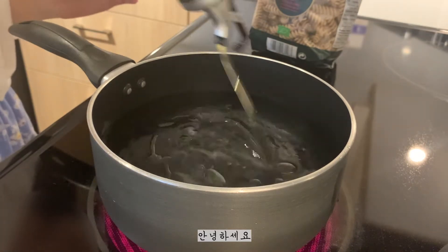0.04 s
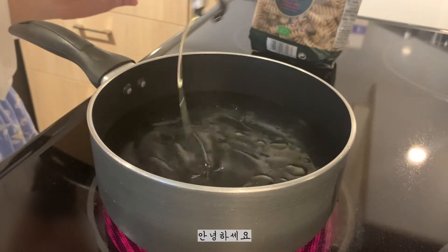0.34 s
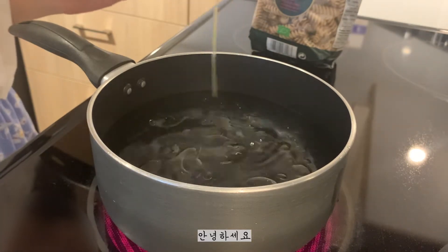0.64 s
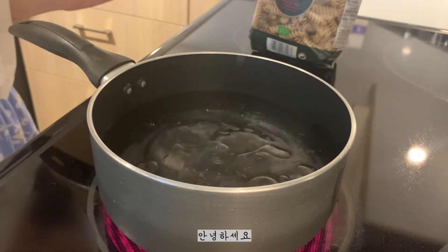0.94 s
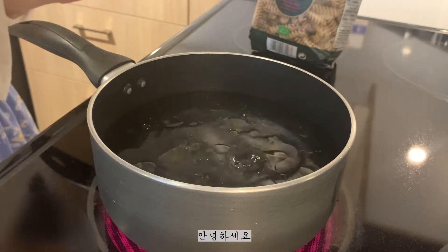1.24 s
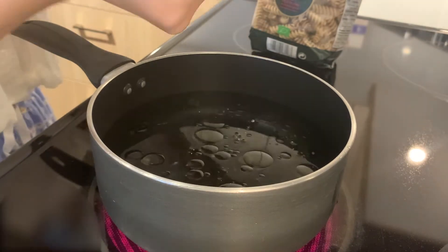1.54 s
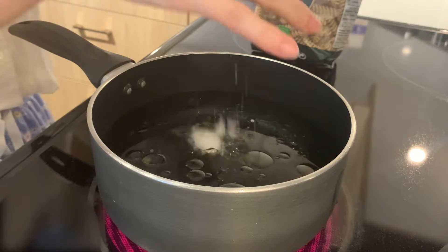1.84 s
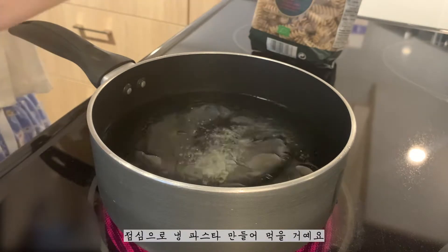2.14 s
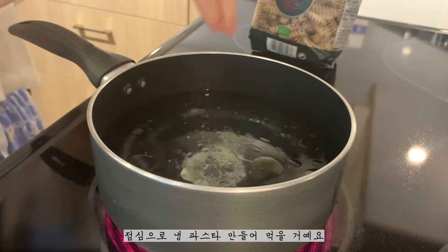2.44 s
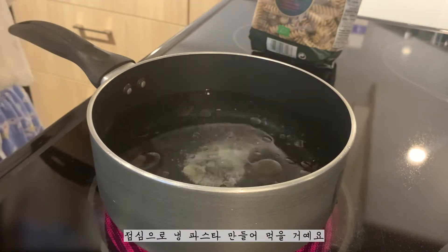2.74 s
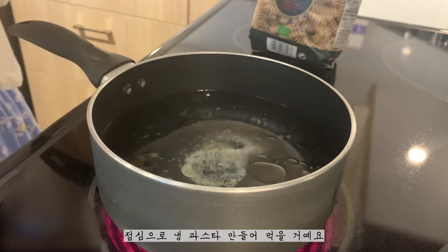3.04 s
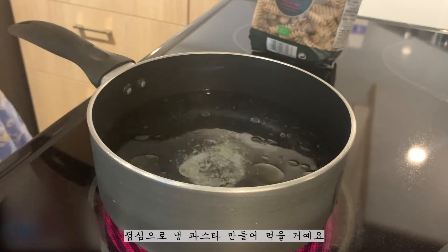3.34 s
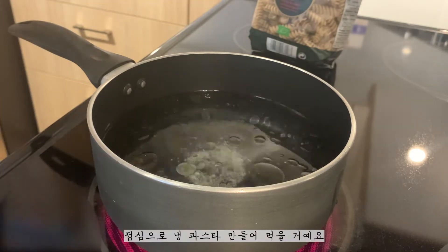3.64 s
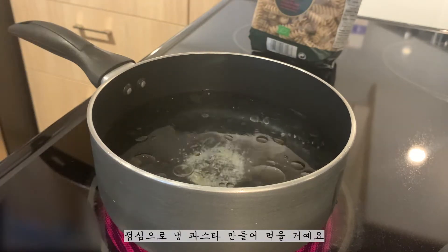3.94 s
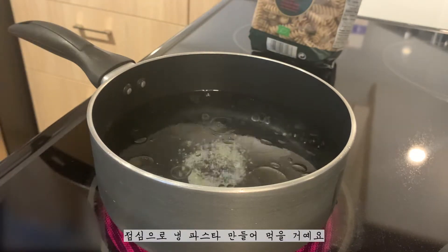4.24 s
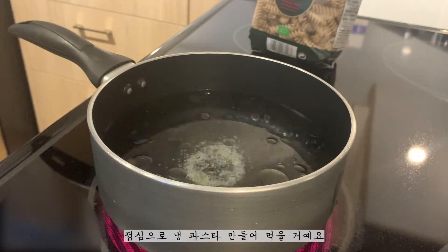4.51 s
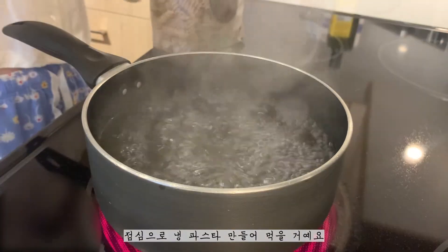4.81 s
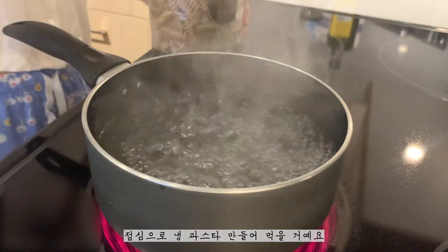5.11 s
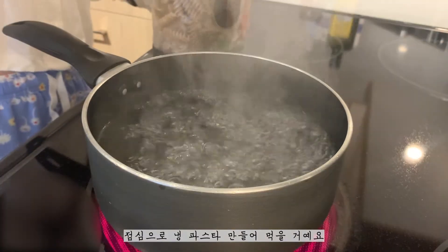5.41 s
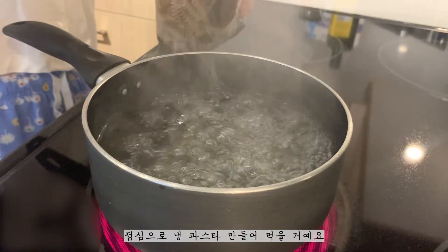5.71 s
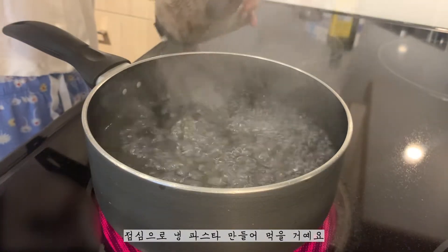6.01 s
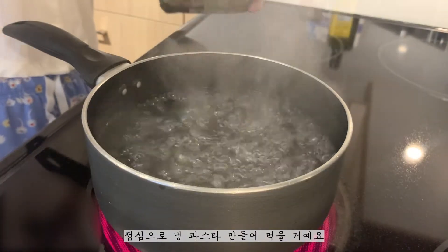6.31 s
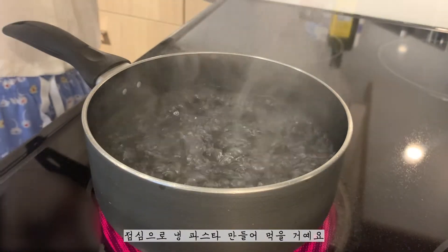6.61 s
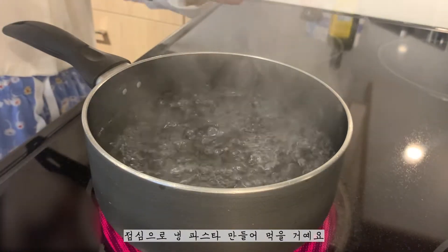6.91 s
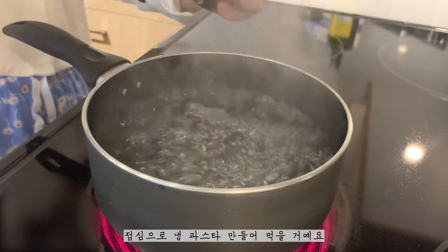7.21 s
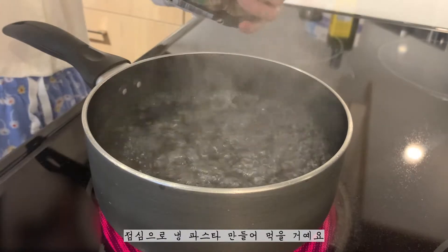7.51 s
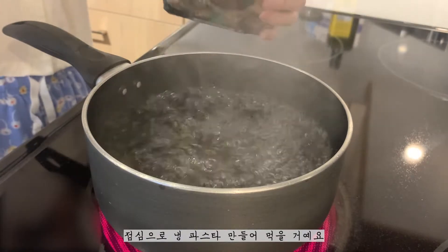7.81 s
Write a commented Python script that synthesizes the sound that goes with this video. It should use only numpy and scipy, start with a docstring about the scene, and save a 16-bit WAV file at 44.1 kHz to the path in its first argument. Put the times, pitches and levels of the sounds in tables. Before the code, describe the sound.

A saucepan of water simmers with a low rumble in a small kitchen, heard close up. Oil crackles briefly on the water, a jar clinks, and salt hisses in. The jar clinks again and knocks on the counter. The sound changes abruptly to a rolling boil, with dry pasta sliding and clacking in a crinkling packet over several shakes. The boil carries on with popping bubbles.

```python
"""A small kitchen: a saucepan simmers on a glass hob. Collapsing steam bubbles rumble, small ones tick,
oil crackles on the water and salt hisses in. A jar clinks, ringing in clusters of modes, and knocks
the counter. Then a rolling boil: bubbles ring and burst, spray fizzes, steam pockets throb, while dry
pasta slides, thuds and clacks in its crinkling packet. The air in the pan rings with boil and pasta."""
import sys
import numpy as np
from scipy import signal
from scipy.fft import rfft, irfft, next_fast_len
from scipy.io import wavfile
from scipy.ndimage import uniform_filter1d

SR = 44100
rng = np.random.default_rng(int(sys.argv[2]) if len(sys.argv) > 2 else 0)


def wav_record(signal):
    """Record a signal, one row per channel, as 16-bit PCM in the file named by sys.argv[1]."""
    frames = np.transpose(np.atleast_2d(signal))
    bounded = np.clip(frames, -1, 1)
    # unit amplitude maps onto the largest positive 16-bit level
    quanta = np.round(bounded * 32767).astype(np.int16)
    wavfile.write(sys.argv[1], SR, quanta)


N = 346626
TIME_S = np.arange(N) / SR
BOIL_START_S = 4.579

# spurts of oil on the water: start_s, length_s, level_db
OIL_SPURTS = [(0.746, .11, -51), (0.889, .015, -48.5), (0.915, .105, -46.5), (1.87, 0.021, -53.5)]
# loudest spits of the oil: start_s, peak_db
OIL_SPITS = [(.752, -31), (0.8111, -27.5), (0.8456, -30.5), (0.928, -24), (0.9586, -28.5), (0.9866, -30),
             (1.0209, -27.5)]


def amp(db):
    """Decibels to gain."""
    return 10 ** (np.asarray(db) / 20)


def unit(x):
    """Scale to rms 1."""
    return x / np.sqrt(np.mean(x ** 2) + 1e-20)


def along(points, hz):
    """Interpolate (freq_hz, value) points on a log axis."""
    freqs_hz, values = np.transpose(points)
    return np.interp(np.log(hz + 1), np.log(freqs_hz + 1), values)


def during(start_s, stop_s, fade_s):
    """Gate with an exponential release."""
    return (TIME_S >= start_s) * np.exp(-np.maximum(TIME_S - stop_s, 0) / fade_s)


def swells(rows, attack_s, release_s):
    """Rise, hold and decay for each (start_s, length_s, level_db) row."""
    return sum(amp(db) * np.clip((TIME_S - s) / attack_s, 0, 1) * during(s, s + length_s, release_s)
               for s, length_s, db in rows)


def filtered(x, response):
    """Apply a frequency response."""
    n = x.shape[-1]
    padded = next_fast_len(n + 2048)
    return irfft(rfft(x, padded) * response(np.fft.rfftfreq(padded, 1 / SR)), padded)[..., :n]


def toned(x, tone):
    """Shape by (freq_hz, gain_db) points; rms 1."""
    return unit(filtered(x, lambda hz: amp(along(tone, hz))))


def noise(size=N):
    """White noise in two rows: head-on, sideways."""
    return rng.standard_normal((2, size))


def band(centre_hz, width_hz, size=N):
    """Resonant noise with gentle skirts; rms 1."""
    return unit(filtered(noise(size), lambda hz: 1 / (1 + (2 * (hz - centre_hz) / width_hz) ** 2)))


def with_energy(x, envelope):
    """Give each row the envelope's energy."""
    return x * np.linalg.norm(envelope) / np.linalg.norm(x, axis=1, keepdims=True)


def add(track, start_s, sound):
    """Mix a sound in at a time."""
    part = track[:, round(start_s * SR):][:, :sound.shape[-1]]
    part += sound[..., :part.shape[-1]]


def grains(per_s, low_hz, high_hz, cycles, spread_db, rise=0):
    """Random damped tones; rise lifts the pitch, as when a bubble nears the surface."""
    when, pitch, luck, place = rng.random((int(per_s * N / SR), 4)).T
    hz = low_hz * (high_hz / low_hz) ** pitch
    size = hz * amp(-spread_db * np.log(.01 + .99 * luck))
    life = (cycles * SR / hz).astype(int) + 2
    grain = np.repeat(np.arange(len(hz)), life)
    offset = np.arange(len(grain)) - (np.cumsum(life) - life)[grain]
    age = offset * hz[grain] / SR / cycles
    phase = 2 * np.pi * cycles * age * (1 + rise * age / 2)
    waves = size[grain] * amp(-40 * age) * np.sin(phase)
    index = (when * N).astype(int)[grain] + offset
    sideways = np.sqrt(12) * (place[grain] - .5)
    return np.array([np.bincount(index, waves * weight, N)[:N] for weight in (1, sideways)])


def scatter(x, t60_s, wet_db):
    """Quick reflections from pan wall, hob and counter."""
    t = np.arange(SR // 10) / SR
    tail = noise(len(t)) * amp(-60 * t / t60_s)
    return x + amp(wet_db) * signal.fftconvolve(x[:1], tail / np.linalg.norm(tail[0]), axes=1)[:, :N]


def rumble():
    """Steam bubbles collapse on the pan's bottom; water churns until the oil calms it; faint hiss."""
    # rumble and hiss spectra: freq_hz, gain_db
    rumble_tone = [(13, -53.5), (22, -36.5), (48, -0.5), (96, -2), (124, 1.5), (163, -16.5), (255, -10.5),
                   (283, -18.5), (350, -18.5), (383, -22), (800, -47.5), (1040, -76), (1760, -120)]
    hiss_tone = [(410, -48.5), (700, -12.5), (841, -2), (1060, -10.5), (5760, -18), (9110, -12),
                 (16000, -14.5)]
    churn = amp(-61.5) * during(0, OIL_SPURTS[0][0], fade_s=.35) * band(140, 30)
    collapses = amp(np.where(TIME_S < BOIL_START_S, -55, -54.5)) * toned(noise(), rumble_tone)
    return collapses + churn + amp(-81.5) * toned(noise(), hiss_tone)


def sizzle():
    """Fine sizzle: flares with the oil, settles after its last spit."""
    # sizzle spectrum: freq_hz, gain_db
    sizzle_tone = [(410, -31.5), (700, -15.5), (863, -1.5), (1180, -9.5), (1560, -6.5), (2370, -11),
                   (3280, -11), (4320, -6.5), (7690, 1.5), (16000, -21)]
    rest_db, flare_db, settle_db_per_s = -75, -61.5, 35
    specks = scatter(grains(600, 900, 14000, cycles=4.4, spread_db=4.4), t60_s=.05, wet_db=0)
    texture = toned(unit(specks) + .7 * noise(), sizzle_tone)
    settling_s = np.maximum(TIME_S - OIL_SPITS[-1][0], 0)
    level = np.hypot(amp(rest_db), amp(flare_db - settle_db_per_s * settling_s))
    return level * during(OIL_SPURTS[0][0], BOIL_START_S, fade_s=.0091) * texture


def tick(tone, t60_s, tail_db, tail_t60_s):
    """Tiny noise burst with a faint tail; peak 1."""
    t = np.arange(SR // 12) / SR
    envelope = amp(-60 * t / t60_s) + amp(tail_db - 60 * t / tail_t60_s)
    burst = toned(noise(len(t)) * envelope, tone)
    return burst / np.abs(burst[0]).max()


def oil_and_salt():
    """Showers on hot water: oil crackles and spits, salt hisses."""
    # oil and salt spectra: freq_hz, gain_db
    oil_tone = [(410, -61), (700, -30), (934, -18), (1330, -25), (2220, -10.5), (2700, -24), (4610, -1.5),
                (5690, -6), (7990, 4), (13500, 0.5), (16000, -5)]
    salt_tone = [(700, -20), (2000, -15), (3200, -15), (5000, -7), (8000, 3), (14000, 4.5), (16000, -0.5)]
    # pinch of salt: start_s, length_s, level_db
    pinch = [(2.05, .115, -57.5)]
    crackle = scatter(grains(800, 900, 16000, cycles=1.9, spread_db=4.2), t60_s=.081, wet_db=-1.6)
    out = swells(OIL_SPURTS, attack_s=.0062, release_s=.014) * toned(crackle, oil_tone)
    out += swells(pinch, attack_s=.038, release_s=.017) * toned(crackle, salt_tone)
    for start_s, db in OIL_SPITS:
        add(out, start_s, amp(db) * tick(oil_tone, t60_s=.0034, tail_db=-19.5, tail_t60_s=.03))
    return out


def simmer_ticks():
    """Small bubbles burst one by one."""
    # bursts: start_s, peak_db
    bursts = [(1.1792, -41.5), (1.3453, -43), (1.65, -45.5), (1.8061, -48), (1.9201, -51), (2.266, -44),
              (2.368, -45), (2.4398, -43), (2.5353, -44), (2.7788, -47), (2.9055, -44), (3.037, -43.5),
              (3.0457, -28), (3.341, -44.5), (3.7653, -46), (4.0082, -44.5), (4.0915, -42.5),
              (4.1928, -45.5), (4.346, -44), (4.4905, -44.5)]
    # burst spectrum: freq_hz, gain_db
    tick_tone = [(500, -15.5), (950, -4), (1400, -9.5), (2000, -3), (2900, -9.5), (4500, 0.5), (6000, -3),
                 (8000, 4), (12000, -7), (16000, -7)]
    out = np.zeros((2, N))
    for start_s, db in bursts:
        add(out, start_s, amp(db) * tick(tick_tone, t60_s=.0038, tail_db=-9.5, tail_t60_s=.11))
    return out


def strike(modes, crack_db, crack_hz, crack_t60_s):
    """Struck body: a brief crack, then clusters of close modes."""
    t = np.arange(SR * 3 // 4) / SR
    out = band(crack_hz, crack_hz * .28, len(t)) * amp(crack_db - 60 * t / crack_t60_s)
    for hz, width_hz, db, t60_s in modes:
        envelope = amp(-60 * t / t60_s) * (1 - np.exp(-t / .0013))
        out += amp(db) * with_energy(band(hz, width_hz, len(t)) * envelope, envelope)
    return out


def jar():
    """Contacts ring the jar, softer ones less brightly; a firm one also knocks the counter."""
    # contacts: start_s, ring_db, knock_db, hardness_hz
    contacts = [(1.4029, -40.5, -83, 14000), (1.4067, -29.5, -77, 15000), (1.437, -37.5, -78, 14000),
                (2.974, -57, -89.5, 3000), (3.131, -43.5, -88.5, 4230), (3.1351, -34.5, -87.5, 4400),
                (3.493, -52, -44, 3500), (3.4986, -35.5, -43, 3500), (3.5049, -31.5, -21.5, 6500),
                (3.52, -35.5, -64, 20000), (4.104, -53.5, -87, 4500)]
    # jar and counter resonances: freq_hz, width_hz, level_db, t60_s
    jar_modes = [(1030, 200, -22.5, 0.12), (2370, 140, -26, 0.16), (3285, 240, -3, 0.055),
                 (3430, 520, -23.5, 0.35), (4470, 1200, -19, 0.25), (7660, 600, -6, 0.12),
                 (8670, 360, 6, 0.066), (9200, 800, -6, 0.16), (9100, 900, -18, 0.17),
                 (10800, 1800, -2.5, 0.09), (12420, 250, -11, 0.16), (13200, 80, -7, 0.1),
                 (15000, 1100, -2.5, .13)]
    counter_modes = [(464, 110, -4.5, 0.083), (602, 32, -3, 0.13), (580, 180, -21.5, 0.71),
                     (716, 32, -13.5, 0.15), (1240, 320, -4.5, 0.031), (1735, 260, -7.5, 0.055),
                     (2400, 300, -14.5, 0.066), (3170, 350, -4, 0.075), (3120, 750, -21, 0.66),
                     (4400, 600, -34.5, 1)]
    ring = strike(jar_modes, crack_db=11.5, crack_hz=9020, crack_t60_s=.0095)
    knock = strike(counter_modes, crack_db=8.5, crack_hz=2600, crack_t60_s=.005)
    knock = filtered(knock, lambda hz: (1j * hz / (330 + 1j * hz)) ** 3)  # stiff top: little bass
    out = np.zeros((2, N))
    for start_s, ring_db, knock_db, hardness_hz in contacts:
        clink = filtered(ring, lambda hz: 1 / (1 + 1.4j * hz / hardness_hz - (hz / hardness_hz) ** 2))
        add(out, start_s, amp(ring_db) * clink + amp(knock_db) * knock)
    return scatter(out, t60_s=.089, wet_db=-13.5)


def plops():
    """Single large bubbles ring with rising pitch."""
    # bubbles: start_s, pitch_hz, level_db
    bubbles = [(1.932, 2600, -68), (6.766, 780, -36), (6.943, 1230, -45), (7.03, 212, -42),
               (7.335, 1113, -49), (7.719, 2415, -39), (7.827, 390, -47), (7.851, 417, -37.5)]
    t60_s, attack_s = .06, .00022
    t = np.arange(SR // 10) / SR
    out = np.zeros((2, N))
    for start_s, hz, db in bubbles:
        envelope = amp(db - 60 * t / t60_s) * (1 - np.exp(-t / attack_s))
        chirp = np.sin(2 * np.pi * hz * t * (1 + 1.7 * t))
        add(out, start_s, envelope * (1.9 * chirp + .5 * band(hz, hz / 4, len(t))))
    return out


def pan_air(x):
    """The air in the pan rings with sounds in and above it."""
    # air resonances: freq_hz, width_hz, gain_db
    modes = [(222, 37, -2), (390, 37, -7), (596, 40, -15.5), (835, 31, -6), (1049, 34, -2), (1206, 23, -3),
             (1380, 18, -1), (1552, 35, -1.5), (2050, 17, -16)]
    return filtered(x, lambda hz: 1 + sum(
        amp(db) * 1j * hz * width_hz / (mode_hz ** 2 - hz ** 2 + 1j * hz * width_hz)
        for mode_hz, width_hz, db in modes))


def rolling_boil():
    """A crowd of bubbles rings in the pan; their spray fizzes."""
    # bubbling contour: time_s, level_db
    contour = [(4.62, -46), (4.88, -41.5), (5.21, -48), (5.55, -39), (6.2, -44), (6.42, -50), (6.95, -48),
               (7.62, -53), (7.86, -46)]
    # bubble and spray spectra: freq_hz, gain_db
    bubble_tone = [(76, -30), (130, 4), (229, -3), (275, -9), (391, -1), (645, -5.5), (724, -9.5),
                   (946, -14), (1190, -11.5), (7000, -22.5), (9100, -48), (15400, -120)]
    fizz_tone = [(2650, -29.5), (4500, -4.5), (5650, -11.5), (8200, -0.5), (10100, 1), (14900, -4),
                 (16000, 0)]
    level = amp(np.interp(TIME_S, *np.transpose(contour)))
    bubbles = grains(500, 213, 5640, cycles=5.9, spread_db=4.05, rise=.066)
    bubbles = unit(scatter(bubbles, t60_s=.072, wet_db=-.15)) + .5 * noise()
    spray = grains(800, 5900, 15000, cycles=7, spread_db=4.54)
    spray = unit(scatter(spray, t60_s=.03, wet_db=-8.5)) + .75 * noise()
    return level * unit(pan_air(toned(bubbles, bubble_tone))) + amp(-48) * toned(spray, fizz_tone)


def steam_throb():
    """Big steam pockets of fairly even size pulse, harder in bouts."""
    # bouts: start_s, length_s, level_db
    bouts = [(6.34, 0.0676, -59), (6.66, .27, -45.5), (7.34, 0.084, -48), (7.69, 0.037, -42)]
    pulse = band(centre_hz=114, width_hz=8.5)
    pulse /= np.sqrt(np.abs(uniform_filter1d(pulse ** 2, SR // 20)) + .29)
    return np.hypot(amp(-56.5), swells(bouts, attack_s=.044, release_s=.03)) * pulse


def snap(tone, ring_hz, tail_db, tail_t60_s):
    """Crack of peak 1 and a short rattle, coloured by one resonance."""
    def coloured(x):
        return toned(filtered(x, lambda hz: 1 + 1.44 / (1 + 2j * (hz - ring_hz) / 350)), tone)

    t = np.arange(SR // 8) / SR
    burst = noise(len(t)) * amp(-60 * t / .0011)
    push = np.roll(burst + 4 * (t == 0), 24, axis=1)
    crack = coloured(filtered(push, lambda hz: 1j))  # pushes the air, then pulls it
    rattle = coloured(noise(len(t)) * amp(-60 * t / tail_t60_s) * (1 - np.exp(-t / .0004)))
    return crack / np.abs(crack[0]).max() + amp(tail_db) * rattle


def thud(attack_s, release_s):
    """Pasta lands in a heap and sounds the packet's hollow."""
    # hollow's resonances: freq_hz, width_hz, level_db
    modes = [(139, 78, -6), (374, 84, -3)]
    t = np.arange(SR // 10) / SR
    envelope = np.minimum(t / attack_s, np.exp((attack_s - t) / release_s))
    out = np.zeros((2, len(t)))
    for mode_hz, width_hz, db in modes:
        ring = band(mode_hz, width_hz, len(t)) * envelope
        ring = filtered(ring, lambda hz: (1j * hz / (60 + 1j * hz)) ** 3)
        out += amp(db) * with_energy(ring, envelope)
    return out


def pasta():
    """With each shake the pieces slide and land; single ones clack and crinkle the film."""
    # shakes of the packet: start_s, length_s, slide_db, thud_db
    shakes = [(4.897, 0.12, -36, -45), (5.121, .022, -34, -25), (5.253, 0.03, -34.5, -44),
              (5.442, 0.033, -32, -39), (5.625, .024, -28.5, -40), (5.818, .04, -31, -32.5),
              (6.112, .033, -43, -36), (6.203, 0.029, -39.5, -55)]
    # pieces striking the packet: start_s, clack_db, crinkle_db
    hits = [(4.5804, -27, -14.5), (4.821, -22, -15), (4.907, -16.5, -29), (4.9216, -23.5, -5.5),
            (4.9379, -19, -23), (4.9696, -19, -9.5), (4.985, -19, -18.5), (5.0913, -23, -16.5),
            (5.1293, -13.5, -25), (5.1448, -9.5, -20.5), (5.259, -26, -33), (5.3038, -9.5, -10.5),
            (5.3284, -21, -19.5), (5.4115, -22.5, -14.5), (5.4647, -32, -19), (5.4794, -19, -17.5),
            (5.5252, -18, -22), (5.6046, -27.5, -12.5), (5.6406, -27, -23.5), (5.6579, -16.5, -6.5),
            (5.6952, -16.5, -19), (5.7851, -21.5, -16), (5.8387, -27.5, -23.5), (5.9002, -18, -28.5),
            (5.924, -18.5, -11.5), (5.9516, -21.5, -19), (6.0694, -20, -26), (6.1202, -14, -12.5),
            (6.1397, -17.5, -20.5), (6.1748, -29, -9), (6.2166, -16, -12.5), (6.248, -20.5, -20),
            (6.3, -24.5, -33), (6.3277, -27.5, -37.5), (7.2444, -37.5, -18)]
    # sliding, piece and film spectra: freq_hz, gain_db
    slide_tone = [(45, -32.5), (115, 0), (230, -7.5), (380, 3.5), (500, -4.5), (820, -2.5), (1300, -14.5),
                  (2000, -5), (4000, -15), (6000, -16), (11600, -13.5), (16000, -30.5)]
    clack_tone = [(60, -19), (160, -6), (500, 3), (1300, -0.5), (2200, 0), (3600, -1), (6000, -6),
                  (9000, -10), (16000, -24)]
    crinkle_tone = [(200, 0), (1500, -31.5), (4000, -10), (6000, -7.5), (9000, -1), (16000, -3.5)]
    thud_attack_s = .01425
    sliding = scatter(grains(800, 219, 15100, cycles=5, spread_db=3.86), t60_s=.11, wet_db=-.6)
    held = amp(-47) * during(BOIL_START_S, 6.3, fade_s=.05)  # tipped packet rustles between shakes
    shaken = swells([row[:3] for row in shakes], attack_s=.0096, release_s=.034)
    out = np.hypot(held, shaken) * toned(sliding, slide_tone)
    for start_s, length_s, _, thud_db in shakes:
        add(out, start_s + length_s - thud_attack_s, amp(thud_db) * thud(thud_attack_s, release_s=.013))
    for start_s, clack_db, crinkle_db in hits:
        piece_hz = 2400 * np.exp(.5 * rng.standard_normal())
        clack = snap(clack_tone, piece_hz, tail_db=-26.5, tail_t60_s=.09)
        crinkle = snap(crinkle_tone, piece_hz, tail_db=-29.5, tail_t60_s=.077)
        add(out, start_s, amp(clack_db) * clack + amp(crinkle_db) * crinkle)
    return pan_air(out)


def steam_pops():
    """Domes of steam burst at the surface."""
    # bursts: start_s, level_db, ring_hz
    bursts = [(6.5945, -23.5, 2400), (6.6425, -23.5, 2420), (6.67, -31.5, 1420), (6.7754, -20.5, 2800),
              (6.8295, -23, 1150), (6.9056, -30.5, 1750), (6.9496, -29, 900), (7.0516, -30, 1130),
              (7.1095, -34, 1340), (7.3627, -26.5, 2600), (7.3964, -29.5, 1450), (7.4786, -26, 1190),
              (7.6651, -26.5, 2400)]
    # burst spectrum: freq_hz, gain_db
    pop_tone = [(100, -9), (300, 7.5), (900, 0), (2000, 1.5), (4000, -3.5), (6500, -8.5), (10000, -5),
                (16000, -17)]
    out = np.zeros((2, N))
    for start_s, db, ring_hz in bursts:
        add(out, start_s, amp(db) * snap(pop_tone, ring_hz, tail_db=-25.5, tail_t60_s=.09))
    return pan_air(out)


def kitchen(x):
    """Room tail; each frequency dies at its own rate."""
    # room decay: freq_hz, t60_s
    decay = [(200, 0.54), (1000, 0.79), (4000, 0.93), (9000, 0.49), (16000, 0.34)]
    hz, t, spectra = signal.stft(noise(SR * 3 // 4), SR, nperseg=256)
    _, tail = signal.istft(spectra * amp(-60 * t / along(decay, hz)[:, None]), SR, nperseg=256)
    delayed = np.pad(x[:1], ((0, 0), (SR // 200, 0)))
    return signal.fftconvolve(delayed, tail / np.linalg.norm(tail[0]), axes=1)[:, :N]


def stereo(x):
    """Sideways sound reaches left and right slightly apart in time."""
    # side signal from the pan's direction: freq_hz, share
    lean = [(100, 0), (400, -.08), (800, -.35), (1900, 0), (3500, -.6), (4500, -.4), (7000, -.9),
            (10000, -.45), (12000, -.03)]
    # side signal from all round: freq_hz, gain_db
    spread = [(60, -18), (200, -11), (380, -10), (750, -3), (2400, -1), (6000, 0), (8000, -8), (11000, -12),
              (13000, -23)]
    # channel balance: freq_hz, left_minus_right_db
    balance = [(150, -0.5), (400, 1.5), (850, -2.5), (1500, -1), (5000, 1.5), (7000, 0)]
    side = filtered(x[0], lambda hz: 1j * along(lean, hz))
    side += filtered(x[1], lambda hz: 1j * amp(along(spread, hz)))
    left_right = np.array([x[0] + side, x[0] - side])
    return filtered(left_right, lambda hz: amp(np.outer([.5, -.5], along(balance, hz))))


def scene():
    """All sources and their share of the room; the jar stands slightly left."""
    water = sizzle() + oil_and_salt() + simmer_ticks()
    water += during(BOIL_START_S, N / SR, fade_s=.01) * (rolling_boil() + steam_throb())
    water += plops() + steam_pops()
    knocks, packet = jar(), pasta()
    room = kitchen(amp(-12.5) * water + amp(-16.5) * knocks + amp(-11) * packet)
    return stereo(water + packet + room + rumble()) + stereo(knocks) * amp([[.5], [-.5]])


def record(dry):
    """Brick-wall low-pass."""
    return filtered(dry, lambda hz: hz < 15850)


dry = scene()
out = record(dry)
wav_record(out)
```